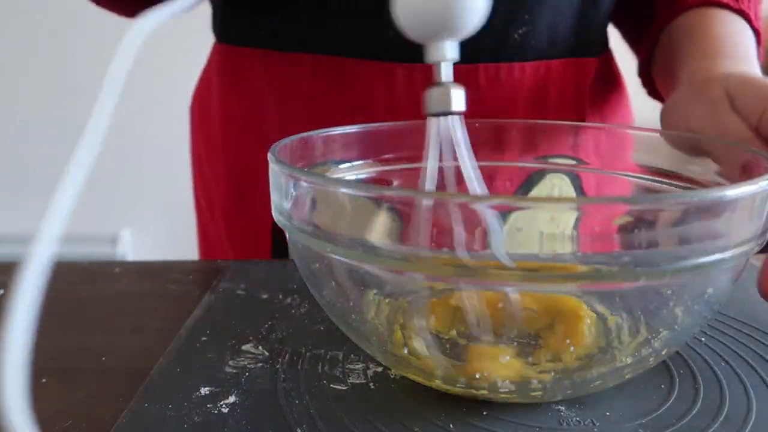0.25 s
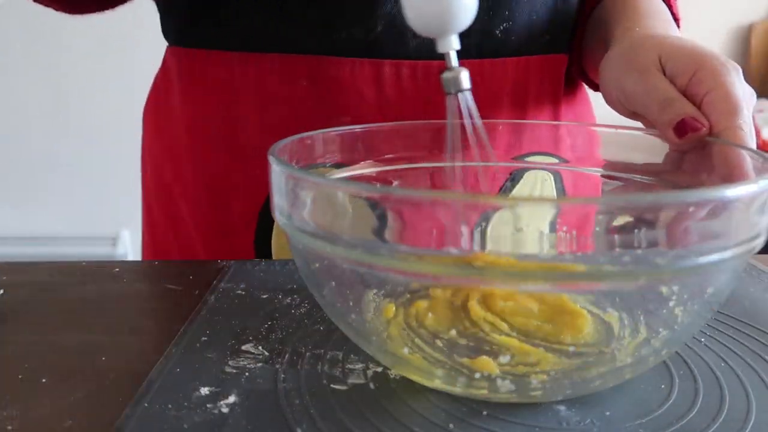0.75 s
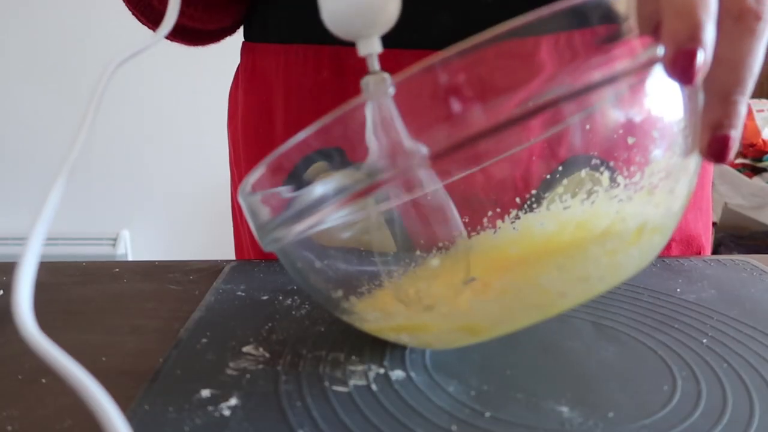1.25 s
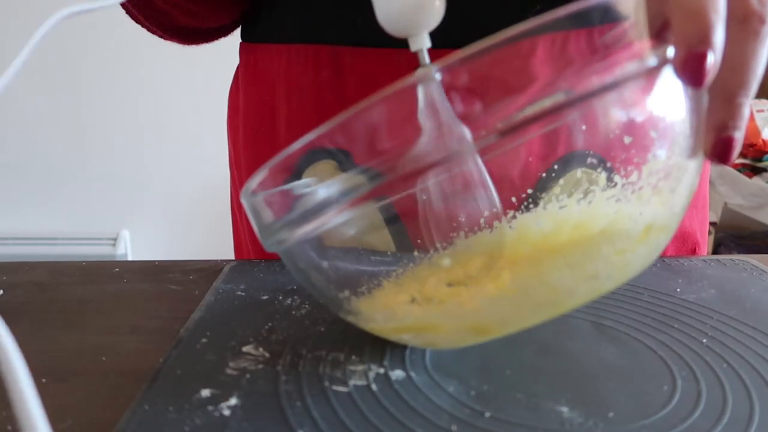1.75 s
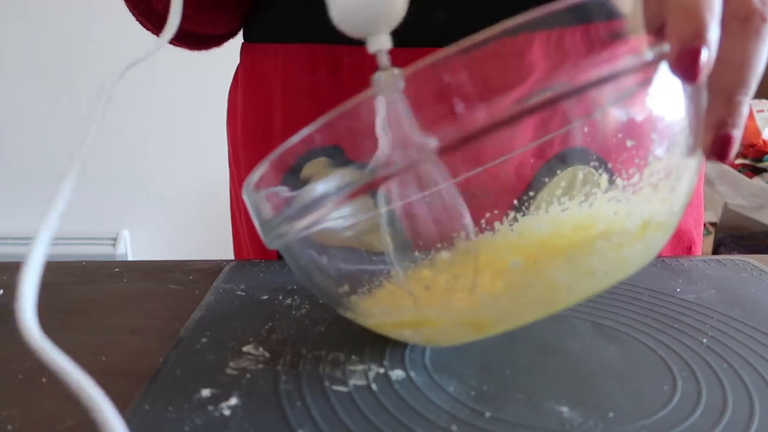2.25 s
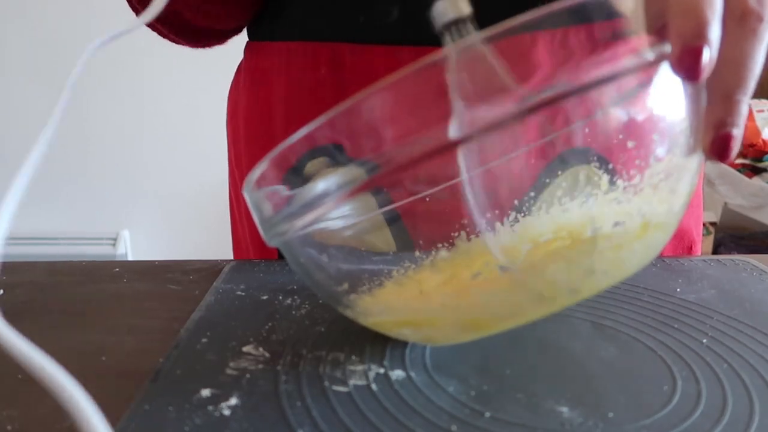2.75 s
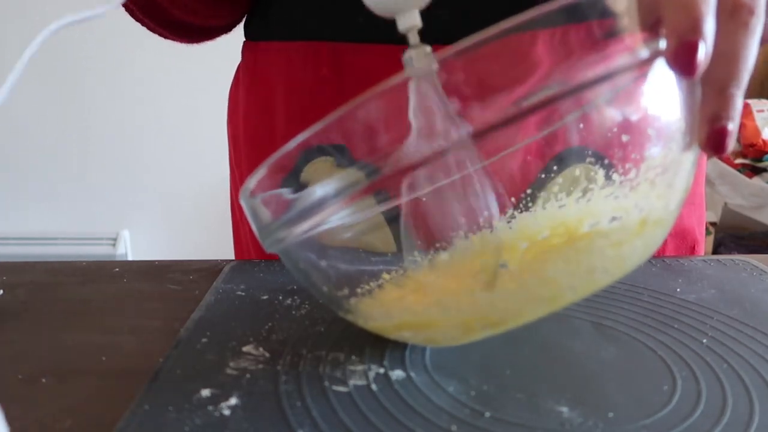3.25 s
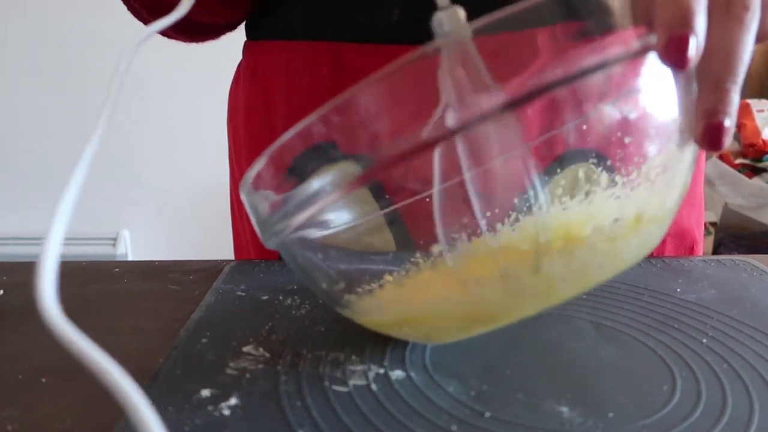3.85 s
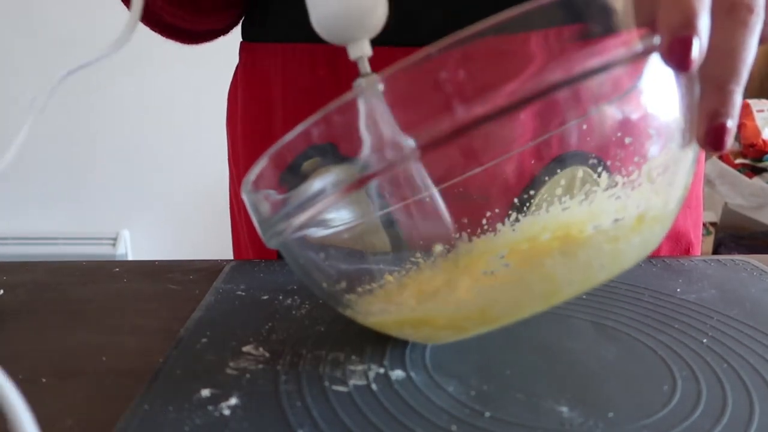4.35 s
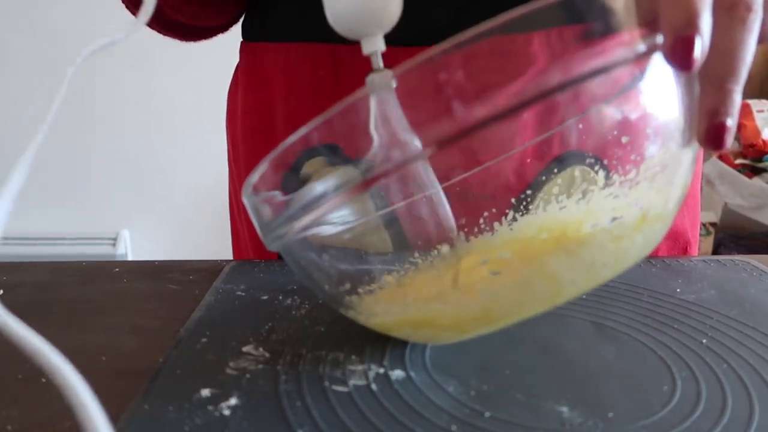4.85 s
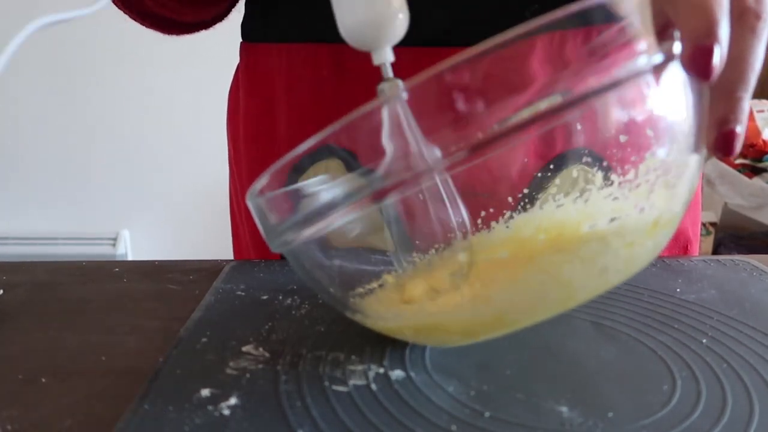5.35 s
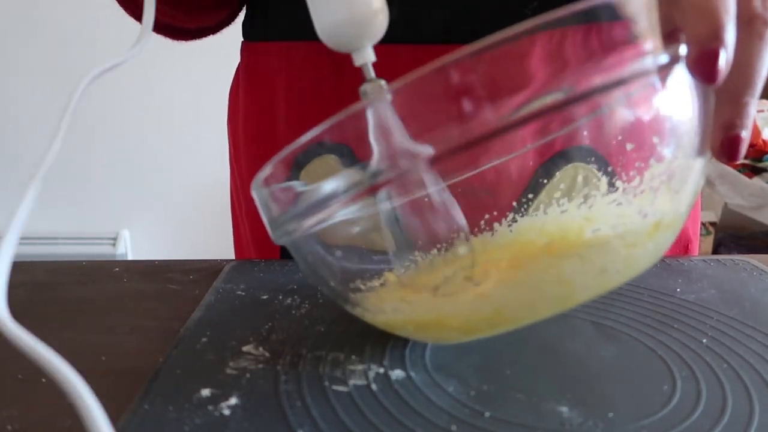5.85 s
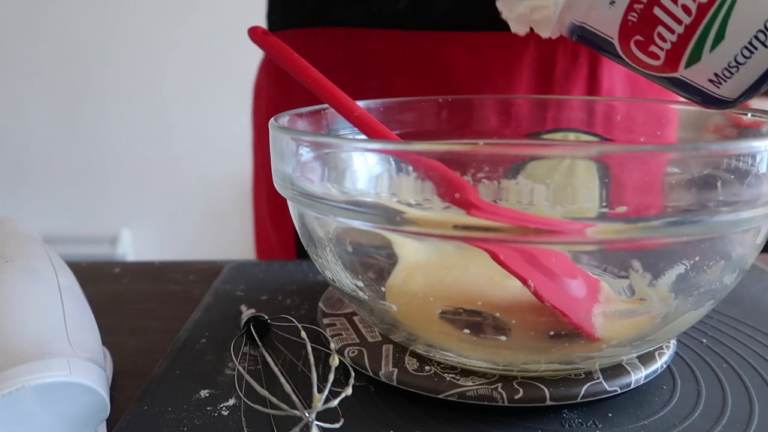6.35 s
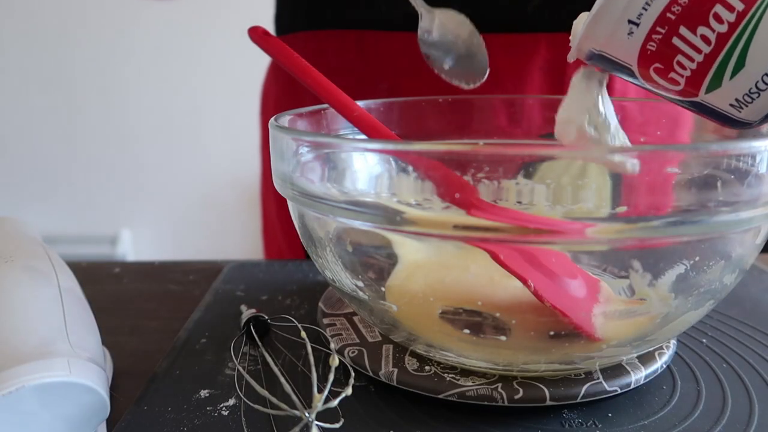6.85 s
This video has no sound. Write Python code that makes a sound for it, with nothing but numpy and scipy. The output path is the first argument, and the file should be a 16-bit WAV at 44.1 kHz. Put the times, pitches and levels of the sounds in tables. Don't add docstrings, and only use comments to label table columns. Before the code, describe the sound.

Close stereo in a kitchen: still whisk wires scrape through sugary grit in a glass bowl with dull knocks and one clear glass ting. Abruptly an electric whisk runs steadily, motor whining while wires rattle densely on the glass. It cuts hard to quiet room air with a faint distant fan hum and a small spoon click at the end.

```python
import sys
import numpy as np
from scipy import signal
from scipy.fft import rfft, irfft, next_fast_len
from scipy.io import wavfile

SR = 44100
rng = np.random.default_rng(int(sys.argv[2]) if len(sys.argv) > 2 else 0)


def generate_wav(sig):
    pcm = np.round(np.clip(np.atleast_2d(sig).T, -1, 1) * 32767).astype(np.int16)
    wavfile.write(sys.argv[1], SR, pcm)


def how_loud(loudness_db):
    steps = np.asarray(loudness_db, float) / 20
    return 10 ** steps


N = 313536


def whisking():
    phase = shaft_phase()
    strikes, zone_levels = wire_strikes(phase)
    return wire_rattle(strikes, zone_levels) + bowl_singing(strikes[0]) + motor(phase)


def wire_strikes(phase):
    bunching = 1 + .6 * np.cos(phase) + .45 * np.cos(2 * phase)
    pressure = how_loud(1.0 * drift(70))
    hit = rng.random(N) < 6000 * bunching / SR
    sizes = hit * pressure * how_loud(2.8 * np.minimum(rng.exponential(1, N), 4))
    strikes = sizes * rng.choice([-1, 1], (2, N))
    return strikes, zone_gains()


# (time [s], pressure on the glass [dB], height up the wall [-1 to 1])
HAND = [(.84, 2.5, 0.047), (1.1, 1, .1), (1.5, 0.5, -0.053), (1.93, -1, 0.049), (2.12, 1.5, -0.071),
        (2.4, -1, 0.065), (2.8, 1, 0.51), (3.0, -0.5, 0.44), (3.35, 2, 0.62), (3.6, -1.5, 0.66),
        (4.0, -0.5, 0.73), (4.28, 2, -0.2), (4.52, 1, .6), (4.95, 0.5, 0.069), (5.05, 2.5, 0.3),
        (5.6, 1.5, 0.033), (5.91, 2, -0.049), (5.99, -3.5, 0.042)]
# (time [s], height lost [same scale])
SWINGS = [(.93, 0.76), (1.29, 0.37), (1.58, 0.62), (1.91, 0.93), (2.25, 0.24), (2.55, 0.78), (3.2, 0.21),
          (3.44, 0.34), (3.82, 0.53), (4.19, .5), (4.78, 1.2), (5.08, 0.78), (5.55, .4), (5.9, 0.23)]
# (time [s], level lost [dB])
LIFTS = [(.97, 4.5), (1.12, 2), (1.307, 5), (1.407, 1), (1.925, 3), (2.058, 7), (2.26, 3.5), (2.424, 2),
         (2.854, 4), (2.973, 2), (3.262, 8), (3.632, 1), (4.026, 6.5), (4.146, 3), (4.355, 3.5), (4.654, 5),
         (4.849, 3), (5.02, 3.5), (5.323, 0.5)]


def hand():
    pressure_db, height = in_time(HAND)
    skip_rise_s, bite_s, swing_s = 0.042, 0.012, 0.12
    lift_db = bumps(LIFTS, skip_rise_s, bite_s)[0]
    return pressure_db, lift_db, height - bumps(SWINGS, swing_s, swing_s)[0]


# (time [s], level gained [dB])
BARE_WIRES = [
    (1.46, 1.4),
    (2.74, 2),
    (2.92, 2.6),
    (4.05, 0.75),
    (4.6, 0.7),
    (5.16, 0.67),
]


def zone_gains():
    press_db, lift_db, height = hand()
    bare_s = 0.13
    lower = how_loud(press_db - lift_db - 3 * height)
    upper = how_loud(press_db - lift_db + 1 * height)
    bare_db = bumps(BARE_WIRES, bare_s, bare_s)[0]
    bright = how_loud(press_db - 0.66 * lift_db + 0.7 * height + bare_db)
    return lower, upper, bright


# (frequency [Hz], level [dB per Hz])
RATTLE = [(560, -30.5), (690, -27.5), (760, -15.5), (1000, -11), (1500, -2), (1950, -5.5), (3300, -5.5),
          (3800, -9.5), (4750, -6), (5600, -13.5), (6200, -15.5), (10200, -31.5), (11200, -37),
          (12500, -32), (14200, -42), (15300, -56)]
# (frequency [Hz], level [dB per Hz])
RATTLE_SIDE = [(1300, -60), (1700, -8), (2500, -10), (3200, -6.5), (4300, 2.5), (6500, -1.5), (10200, -2),
               (12500, -5), (13700, -21), (15200, -40)]
# (frequency [Hz], level [dB], ring time t60 [s])
HELD_BOWL = [(731.7, -23, 0.24), (1125, -11.5, 0.28), (1972, -14.5, 0.11), (3280, -15.5, 0.034),
             (3970, -18, 0.044)]


def wire_rattle(strikes, zones):
    lower, upper, bright = zones
    froth = how_loud(-13) * rng.standard_normal((4, 2, N))
    pitches = np.geomspace(700, 15000, num=24)
    reach = rng.random(N) * len(pitches)
    out = np.zeros((2, N))
    for k, hz in enumerate(pitches):
        near = np.abs(reach - k) < 3.0
        wash = froth[k % 4] * (hz / 2000) ** 0.19
        patch = ring(strikes * near * rng.choice([-1, 1]) + wash, hz, 17.0 / hz)
        zone = lower if hz < 2000 else upper if hz < 3700 else bright
        flat = np.sqrt(hz) / np.std(patch[0, ::7])
        out += patch * (flat * zone * swell(1.6, 8))
    hard = strikes[0] * (rng.random(N) < .035) * upper
    click = how_loud(-12) * rms_one(hard)
    clack = how_loud(-15) * rms_one(ring(hard, 3000, .002))
    out[0] += out[0].std() * (click + clack)
    mid, side = coloured(RATTLE, out[0]), coloured(RATTLE_SIDE, out[1])
    for hz, mode_db, t60 in HELD_BOWL:
        mid += how_loud(mode_db - 8) * swell(2.4, 2.5) * mode_ring(strikes[0], hz, t60)
    return how_loud(-27) * np.array([mid, how_loud(-15) * side])


# (frequency [Hz], ring time t60 [s], off-axis level [dB])
SINGING = [(1635, 0.021, -35), (2167, 0.043, -23), (2407, 0.041, -16.5), (3200, 0.012, -18),
           (1906, 0.023, -25), (2660, 0.022, -12)]
# (height [-1 to 1], level there [dB], gain once the mix is thick [dB])
SWEET_SPOTS = [(-0.65, -31, 3), (0.78, -32, 1.5), (0.09, -32.5, -8), (-0.31, -43, 10), (-0.46, -44, 14.5),
               (0.86, -37, -7)]
# (time [s], level gained [dB])
RIM_SINGS = [
    (3.13, 10),
    (3.43, 9.8),
    (3.53, 14),
    (3.76, 15),
    (3.95, 11.4),
]
# (start [s], end [s])
THICKENS_S = [3.8, 5.8]


def bowl_singing(strikes):
    press_db, lift_db, height = hand()
    thick = np.interp(np.arange(N) / SR, THICKENS_S, [0, 1])
    sing_db = []
    for spot, db, thick_db in SWEET_SPOTS:
        off_spot_db = 13.5 * (height - spot) ** 2
        sing_db.append(db + thick_db * thick + press_db - lift_db - off_spot_db)
    rim_rise_s, rim_fall_s = 0.12, 0.082
    sing_db[-1] += bumps(RIM_SINGS, rim_rise_s, rim_fall_s)[0]
    out = np.zeros((2, N))
    for (hz, t60, side_db), mode_db in zip(SINGING, sing_db):
        mode = how_loud(mode_db - 3.0) * swell(1.57, 6) * mode_ring(strikes, hz, t60)
        out += [mode, how_loud(side_db) * quarter_late(mode, hz)]
    return out


# (time [s], turns per second [Hz])
SHAFT = [(.84, 221.8), (1.9, 221.3), (2.2, 220), (2.9, 222), (4.1, 221.8), (4.5, 220), (5.0, 221.5),
         (5.4, 219.5), (5.6, 216), (5.99, 216.5)]


def shaft_phase():
    turns_hz = in_time(SHAFT)[0] * (1 + .004 * drift(12))
    return 2 * np.pi * np.cumsum(turns_hz) / SR


# (time [s], load heard as whine [dB], bowl seated on the worktop [dB])
MOTOR = [(.86, -47, 4), (2.1, -45, -1.5), (2.35, -49, -1.5), (2.6, -47.5, 3.5), (2.93, -48, -9),
         (3.12, -48, 9), (3.3, -43.5, -9), (3.5, -54, 2), (3.75, -54, -3), (4.0, -48.5, -2), (4.25, -41, 2),
         (4.5, -42.5, -2), (4.68, -47, -2.5), (5.05, -41.5, 0), (5.32, -43.5, -1.5), (5.5, -42, 3),
         (5.88, -42, 1), (5.99, -51, -2)]
# (multiple of shaft speed, level [dB])
GEAR_ORDERS = [(4, 2.5), (5, -6), (6, -3), (8, 3.5), (12, -44)]
# (frequency [Hz], level [dB per Hz])
DRONE = [(150, -50), (200, -22.5), (280, -2), (340, -4.5), (403, 5.5), (440, 1), (480, 8.5), (560, -0.5),
         (660, -12), (760, -35), (900, -56)]
# (frequency [Hz], level [dB per Hz])
DRONE_SIDE = [(200, -46), (400, 3), (550, -8), (700, -1), (850, -10), (950, -39)]
# (frequency [Hz], level [dB per Hz])
WORKTOP = [(12, -43), (20, -15), (48, -7), (75, 2), (91, 0.5), (102, -12), (135, -1.5), (143, -6),
           (157, -23), (175, -15.5), (230, -60), (390, -120)]
# (time [s], level gained [dB])
LOOSE_GRIP = [
    (2.7, 4.6),
    (3.13, 4),
    (3.8, 6.7),
    (3.95, 6.2),
    (4.93, 4.3),
]


def motor(phase):
    load_db, seated_db = in_time(MOTOR)
    eased_db = 1.2 * hand()[1]
    loose_s = .13
    loose_db = bumps(LOOSE_GRIP, loose_s, loose_s)[0]
    drone_db = -53.5 + 0.28 * seated_db + loose_db - eased_db
    whine = sum(how_loud(db) * swell(2.0, 10) * np.sin(k * phase + k) for k, db in GEAR_ORDERS)
    mid = how_loud(load_db - eased_db) * whine
    mid += how_loud(drone_db + 3.0 + 1.74 * drift(14)) * coloured(DRONE)
    mid += how_loud(-50.5 + seated_db - eased_db) * coloured(WORKTOP)
    side = how_loud(-74.0 + 4.8 * drift(8.1)) * coloured(DRONE_SIDE)
    return np.array([mid, side])


# (time [s], scrape [dB over rest], worktop rumble [dB over rest])
STROKES = [(.07, 9, 3), (.13, 1.5, 4.5), (.2, 7.5, 3), (.272, 0, 7), (.35, 8, 11.5), (.42, 5, 2),
           (.518, 10, 2.5), (.584, 7.5, 12.5), (.7, 3, 5), (.756, 4, 12), (.81, 3, 7.5)]
# (frequency [Hz], level [dB per Hz])
SCRAPE = [(410, -50), (700, -20), (943, -12.5), (1030, -2), (1130, -2), (1340, 1.5), (2430, -0.5),
          (4830, -5.5), (5860, -12.5), (6760, -10), (15500, -24)]
# (frequency [Hz], level [dB per Hz])
RUMBLE = [(12, -44), (20, -9), (145, 0), (279, -11), (375, 0), (441, -7.5), (863, -14), (952, -14),
          (1000, -18), (1300, -49), (2200, -120)]
# (frequency [Hz], level [dB], ring time t60 [s])
WIRES = [(1510, -14.5, 0.022), (2810, -11, 0.04), (3910, -15, 0.035), (4736, -11.5, 0.045),
         (6780, -15.5, .035), (8600, -25, .03)]


def dragging():
    rise_s, fall_s = 0.054, 0.075
    scrape_db, rumble_db = bumps(STROKES, rise_s, fall_s) + np.array([[-53], [-49.5]])
    grit = rng.standard_normal((2, N)) * how_loud(2.0 * drift(51))
    scrape = np.array([coloured(SCRAPE, grit[0]), how_loud(-5.5) * coloured(RATTLE_SIDE, grit[1])])
    for hz, db, t60 in WIRES:
        scrape[0] += how_loud(db) * swell(4.0, 8.5) * mode_ring(grit[0], hz, t60)
    out = how_loud(scrape_db + 0.5) * scrape + bowl_tap()
    out[0] += how_loud(rumble_db - 1.5) * coloured(RUMBLE)
    out[1] += room_side()
    return out


# (frequency [Hz], level [dB], ring time t60 [s])
FREE_BOWL = [(931, -7, 1.8), (1351, -16, .09), (1674, -2, .1), (1671, -12, 1.2), (2594, 1, .55),
             (3687, -3, .18), (4950, -3, .16), (6372, -5, .12), (6643, -7, .12), (6853, -12, .2),
             (7617, -16, .15), (8613, -20, .2)]


def bowl_tap():
    tap_s, tap_db = .495, -31.5
    out = np.zeros((2, N))
    for hz, db, t60 in FREE_BOWL:
        mode = how_loud(tap_db + db) * ring(click_at(tap_s), hz, t60)
        out += [mode, how_loud(at_hz(RATTLE_SIDE, hz) + 1.5) * quarter_late(mode, hz)]
    return out


# (time [s], crack peak [dB], body frequency [Hz], body level [dB], body t60 [s])
KNOCKS = [(.068, -46, 1370, -38, .03), (.076, -39, 2300, -40, .04), (.168, -45, 3500, -42, .02),
          (.219, -43.5, 338, -35, 0.078), (.2675, -35, 396, -23.5, 0.023), (.295, -50, 352, -38, .03),
          (.3485, -35, 533, -28.5, 0.043), (.356, -39, 293, -30, 0.028), (.578, -32.5, 384, -27, 0.075),
          (.739, -49, 150, -35, 0.019), (.7497, -32, 251, -14, 0.01), (.790, -35.5, 610, -26.5, .03),
          (.800, -41, 208, -29, 0.027), (6.90, -62, 1610, -41.5, 0.027), (7.0785, -52, 2450, -42, .02),
          (7.094, -46, 2450, -43, .02), (7.085, -60, 60, -38, .1)]


def knocks():
    out, t = np.zeros(N), np.arange(N // 40) / SR
    crack_band = signal.butter(3, [700, 3600], "band", fs=SR, output="sos")
    for s, crack_db, hz, body_db, t60 in KNOCKS:
        body = np.sin(2 * np.pi * hz * t) * how_loud(body_db - 60 * t / t60)
        crack = signal.sosfilt(crack_band, rng.standard_normal(len(t)))
        crack *= how_loud(crack_db + 10.5 - 60 * t / 0.028)
        at = round(s * SR)
        out[at:at + len(t)] += (body + crack)[:N - at]
    return out


# (frequency [Hz], level [dB], ring time t60 [s])
SPOON = [(1580, 3, 0.019), (2300, -4.5, 0.017), (4200, -37, .006)]


def spoon():
    spoon_s, spoon_db = 7.1077, -23
    return sum(how_loud(spoon_db + db) * ring(click_at(spoon_s), hz, t60) for hz, db, t60 in SPOON)


# (frequency [Hz], level [dB per Hz])
KITCHEN = [(12, -41), (20, -8), (49, -17), (85, -6.5), (148, -4), (342, -8), (452, -11), (491, -12),
           (631, -18), (725, -19), (1230, -22), (1340, -22), (9660, -49), (11100, -47.5), (15500, -56)]
# (time [s], level [dB])
KITCHEN_LEVEL = [(5.99, -46.5), (6.03, -43.5), (6.052, -44.5), (6.292, -42.5), (6.388, -43.5), (6.718, -44),
                 (6.914, -43), (7.01, -44.5), (7.11, -41.5)]


def kitchen():
    fan_hz, fan_db = 635, -56.5
    mid = how_loud(in_time(KITCHEN_LEVEL)[0]) * coloured(KITCHEN)
    mid += how_loud(fan_db + 2.0 * drift(3.9)) * np.sin(2 * np.pi * fan_hz * np.arange(N) / SR)
    return np.array([mid + spoon(), room_side()])


# (frequency [Hz], level [dB per Hz])
KITCHEN_SIDE = [(12, -68), (20, -42), (180, -8), (439, -6.5), (2150, -17), (2400, -19), (2680, -16),
                (4070, -20), (14300, -34), (15500, -48)]


def room_side():
    return how_loud(-58.5) * coloured(KITCHEN_SIDE)


def rms_one(x):
    return x / np.sqrt(np.mean(x ** 2) + 1e-20)


def in_time(rows):
    s, *columns = np.transpose(rows)
    return [np.interp(np.arange(N) / SR, s, c) for c in columns]


def at_hz(points, hz):
    point_hz, point_db = np.transpose(points)
    return np.interp(np.log(hz), np.log(point_hz), point_db)


def drift(rate):
    r = np.exp(-80 * np.pi * rate / SR)
    noise = rng.standard_normal(N // 40 + 2002)
    slow = signal.lfilter([1], [1, -2 * r, r * r], noise)[2000:]
    return np.interp(np.arange(N) / 40, np.arange(len(slow)), rms_one(slow))


def swell(depth_db, rate):
    coarse = np.arange(0, N + 64, 64)
    gain = how_loud(depth_db * drift(rate)[np.minimum(coarse, N - 1)])
    return np.interp(np.arange(N), coarse, gain)


def bumps(rows, rise_s, fall_s):
    s, *columns = np.transpose(rows)
    t = np.arange(0, N + 32, 32) / SR
    late = t[:, None] - s
    reach = np.clip(late / np.where(late < 0, rise_s, fall_s), -1, 1)
    hump = np.cos(np.pi / 2 * reach) ** 2
    return [np.interp(np.arange(N) / SR, t, hump @ c) for c in columns]


def ring(clicks, hz, t60):
    r, w = how_loud(-60 / (t60 * SR)), 2 * np.pi * hz / SR
    return signal.lfilter([0, np.sin(w)], [1, -2 * r * np.cos(w), r * r], clicks + 1e-18)


def mode_ring(strikes, hz, t60):
    return rms_one(ring(ring(strikes, hz, t60 / 3), hz, t60))


def quarter_late(mode, hz):
    return np.roll(mode, round(SR / hz / 4))


def coloured(spectrum, x=None):
    x = rng.standard_normal(N) if x is None else x
    size = next_fast_len(N)
    hz = np.maximum(np.arange(size // 2 + 1) * SR / size, 1)
    return rms_one(irfft(rfft(x, size) * how_loud(at_hz(spectrum, hz)), size)[:N])


def click_at(s):
    return 1. * (np.arange(N) == min(round(s * SR), N - 1))


# (whisking starts [s], whisking ends [s])
CHANGES_S = [0.8334, 5.990]


def scene():
    t = np.arange(N) / SR
    second, third = [np.clip((t - s) / 0.00028, 0, 1) for s in CHANGES_S]
    mid, side = (1 - second) * dragging() + (second - third) * whisking() + third * kitchen()
    blows = knocks()
    mid = mid + blows
    side = side + how_loud(-19.5) * np.diff(np.roll(blows, 30), prepend=0) * 10
    return np.array([mid + side, mid - side])


def top_cut(x):
    return signal.sosfilt(signal.butter(12, 15200, fs=SR, output="sos"), x)


def record(dry):
    rounded = .5 * np.tanh(dry / .5)
    return top_cut(rounded)


dry = scene()
out = record(dry)
generate_wav(out)
```